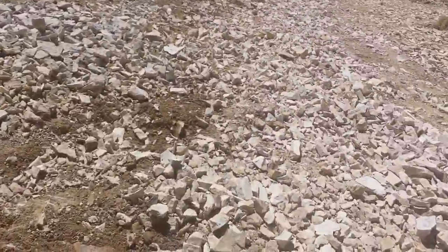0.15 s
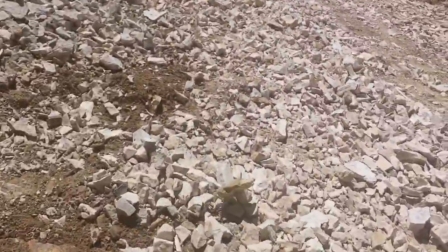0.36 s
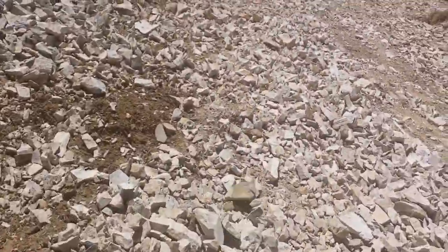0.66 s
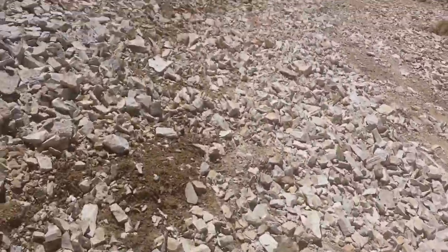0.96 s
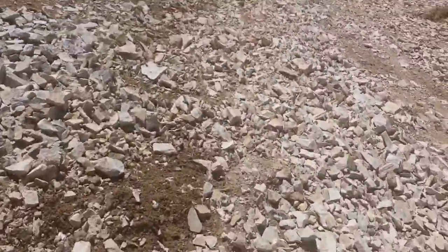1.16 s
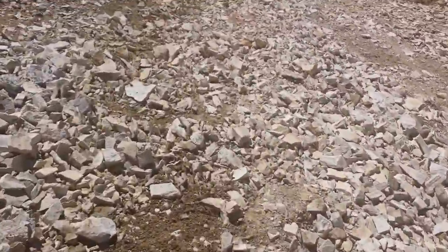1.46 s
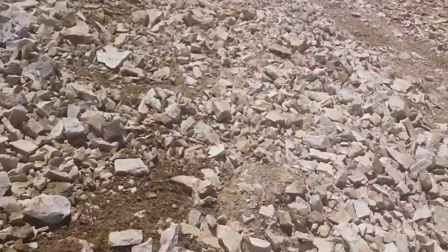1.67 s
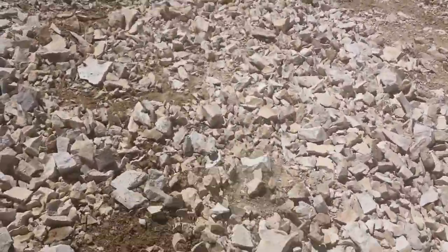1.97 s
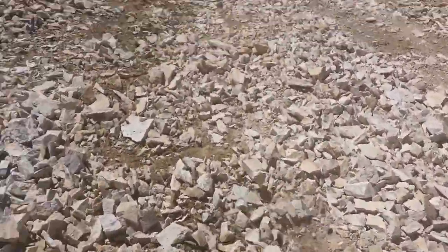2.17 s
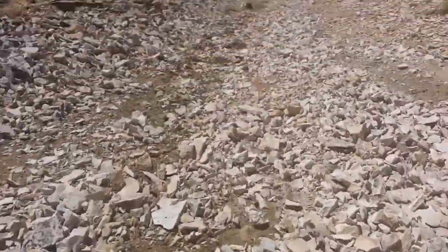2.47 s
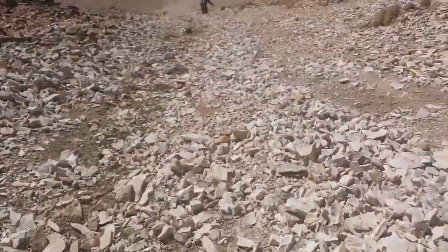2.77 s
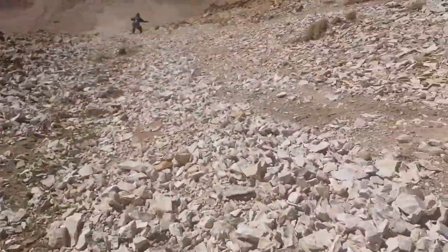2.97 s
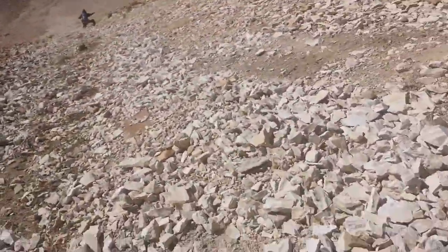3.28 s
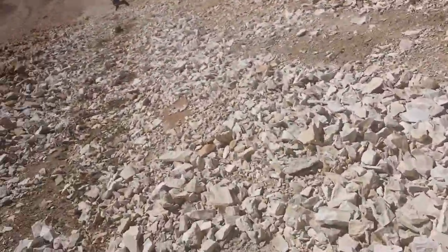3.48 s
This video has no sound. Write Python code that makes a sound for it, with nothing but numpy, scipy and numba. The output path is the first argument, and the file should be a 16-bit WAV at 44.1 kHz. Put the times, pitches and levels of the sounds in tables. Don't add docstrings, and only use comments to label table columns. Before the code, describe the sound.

Boots shift on loose scree outdoors: sharp stone clacks and a gravel slip, a quieter trickle, a strong second slide, then scattered ticking. Low wind thumps a close handheld microphone, mostly on the left.

```python
import sys
import numpy as np
from scipy import signal
from scipy.fft import rfft, irfft
from scipy.io import wavfile
from scipy.ndimage import uniform_filter1d
from numba import njit

SR = 44100
rng = np.random.default_rng(int(sys.argv[2]) if len(sys.argv) > 2 else 0)


def store_pcm(level_fs):
    pcm = np.round(np.clip(level_fs, -1, 1) * 32767).astype(np.int16)
    wavfile.write(sys.argv[1], SR, np.atleast_2d(pcm).T)


def boost_factor(decibels):
    exponent = np.asarray(decibels, float) / 20
    return 10 ** exponent


N = 159642

# pitch_hz, level_db
STONE_COLOUR = [(250, -54), (600, -19.5), (1300, -7.5), (3000, -2.5), (6000, 0), (15000, -4)]
# pitch_hz, level_db
LEFT_PORT = [(800, 4), (1500, 7), (3000, 4), (5400, 8.5), (7000, 3), (9000, -4.5), (10200, -12),
             (15000, -16)]
# pitch_hz, level_db
RIGHT_PORT = [(800, 1.5), (1500, -3), (3200, 1.5), (4000, 0), (7000, -0.5), (10000, -1.5), (13000, -4),
              (15000, -12)]

PORT_LAG_S = 0.00012
CHATTER_S = 0.003


def curve(table, order):
    rows = np.array(table, float)
    return np.interp(np.arange(N) / SR, rows[:, 0], rows[:, order])


def at_hz(points, hz):
    rows = np.array(points, float)
    return np.interp(np.log(hz), np.log(rows[:, 0]), rows[:, 1])


def unit(x):
    return x / np.sqrt(np.mean(x ** 2))


def colour(x, points, share=0.9):
    hz = np.maximum(np.arange(1025) * SR / 2048, 5)
    cepstrum = irfft(share * at_hz(points, hz) * np.log(10) / 20)
    cepstrum[1:1024] *= 2
    cepstrum[1025:] = 0
    impulse = irfft(np.exp(rfft(cepstrum)))
    return signal.fftconvolve(x, impulse)[:N]


def walk(rate_hz):
    hold = int(SR / rate_hz)
    levels = np.repeat(rng.standard_normal(N // 50)[:N // hold + 1], hold)
    smooth = uniform_filter1d(uniform_filter1d(levels, hold), hold)
    return unit(smooth[:N])


@njit
def ring(out, at, hz, cycles, size):
    for k in range(len(at)):
        i, w = int(at[k]), 2 * np.pi * hz[k] / SR
        turn = np.exp(1j * w - hz[k] / SR / cycles[k])
        z = size[k] * np.exp(1j * w * (i + 1 - at[k]))
        end = min(len(out), i + int(6 * cycles[k] * SR / hz[k]) + 2)
        for j in range(i + 1, end):
            if j >= 0:
                out[j] += z.imag
            z *= turn
    return out


def strike(at_s, hz, cycles, size, place, pan_db):
    ports = []
    for side in (1, -1):
        arrival = (at_s + side * place * PORT_LAG_S / 2) * SR
        ports.append(ring(np.zeros(N), arrival, hz, cycles, size * boost_factor(side * pan_db / 2)))
    return np.array(ports)


def grains(count, low_hz, high_hz, cycles, scatter_db, pan_db, modes=1, span=1.):
    c = rng.random((count, 3 + 2 * modes)).T
    g = rng.standard_normal((count, 3)).T
    size = boost_factor(-scatter_db * np.log(np.maximum(c[1], 7e-2)))
    ring_cycles = cycles * np.exp(.5 * g[2])
    pitches = low_hz + (high_hz - low_hz) * (span * c[3:3 + modes] + (1 - span) * c[2])
    delays = 2 * CHATTER_S * c[3 + modes:] ** 3
    out = 0
    for hz, late in zip(pitches, delays):
        mode_size = size * np.sqrt(hz / ring_cycles) * np.exp(-late / CHATTER_S)
        out = out + strike(c[0] * N / SR + late, hz, ring_cycles, mode_size, g[0], pan_db * g[1])
    return unit(out)


def surges(count, decay_s):
    c = rng.random((count, 2)).T
    kicks = np.bincount((c[0] * N).astype(int), -np.log(c[1] + 0.0065), N)
    flow = signal.lfilter([1], [1, -np.exp(-1 / (decay_s * SR))], kicks)
    return unit(np.sqrt(0.44 + flow))


def scree():
    # start_s, rush_level_db, loose_stones_against_rush_db
    slide = [(0, -19.5, -25), (.3, -24.5, -5.5), (.5, -24.5, -6), (.6, -31.5, 1), (.88, -32, -1),
             (1.03, -33, -3), (1.33, -35.5, 5), (1.39, -16.5, -12), (1.76, -20, -4), (1.97, -24.5, -1),
             (2.3, -27.5, -3), (2.45, -27.5, -0.5), (2.54, -32, 1), (2.62, -23, -18), (2.86, -26.5, 0),
             (3.1, -29, 2), (3.45, -30, 4.5), (3.62, -20, -7)]
    pebbles = grains(count=16000, low_hz=510, high_hz=8670, cycles=1.97, scatter_db=2.0, pan_db=3.0)
    pebbles = pebbles * surges(count=130, decay_s=0.0026)
    grit = grains(count=16000, low_hz=7900, high_hz=15800, cycles=0.76, scatter_db=3.5, pan_db=-2.0)
    grit = grit * surges(count=70, decay_s=0.015)
    loose = grains(count=1100, low_hz=393, high_hz=15000, cycles=9.4, scatter_db=2.5, pan_db=2,
                   modes=7, span=.4)
    loose = loose * boost_factor(curve(slide, order=2) - 2.0)
    return (0.58 * (pebbles + grit) + loose) * boost_factor(curve(slide, order=1))


def clacks():
    # start_s, peak_db, pitch_hz
    bigger = [(0.0199, -8, 3190), (0.0674, -9, 7080), (0.0952, -6, 5800), (0.1231, -8, 7290),
              (0.1506, 0, 6510), (0.175, -10, 5490), (0.2468, -8, 4370), (0.2703, -12, 5810),
              (0.3486, -10, 6760), (0.4804, -10, 5430), (0.5067, -11, 5430), (0.6225, -16, 5710),
              (0.6644, -15, 5150), (0.6888, -17, 2580), (0.7158, -12, 5920), (0.7572, -13, 5700),
              (0.8031, -14, 5720), (1.1368, -18, 6230), (1.288, -13, 5730), (1.3379, -15, 4880),
              (1.3964, -7, 5500), (1.4706, -6, 5400), (1.7409, -7, 4870), (1.8871, -8, 5410),
              (1.9155, -8, 5710),
              (2.0592, -6, 5350), (2.0734, -12, 5200), (2.144, -9, 5400), (2.162, -8, 5450),
             (2.2238, -11, 5750), (2.376, -11, 6080), (2.3885, -12, 5900), (2.4104, -12, 5660),
             (2.8789, -10, 5680), (2.9287, -10, 5600), (2.9597, -8, 5010), (3.1128, -12, 5830),
             (3.2126, -8, 5120), (3.2314, -11, 5510), (3.2595, -12, 5250), (3.3089, -10, 7910),
             (3.3199, -13, 5150), (3.3867, -10, 5850), (3.4116, -11, 5550), (3.4845, -10, 5140),
             (3.5129, -9, 5110)]
    at, db, hz = np.array(bigger).astype(float).T
    c = rng.random((len(at), 32)).T
    g = rng.standard_normal((len(at), 16)).T
    place, pan = .2 * g[0], g[1]
    at = at + .0006
    ports_db = at_hz(LEFT_PORT, hz) / 2 + at_hz(RIGHT_PORT, hz) / 2
    out = strike(at, hz, 7 + db / 4, boost_factor(db - at_hz(STONE_COLOUR, hz) - ports_db), place, pan)
    for k in range(2, 16):
        late = 3 * CHATTER_S * c[16 + k] ** 0.92 * (k % 2)
        mode_hz = 800 + 12000 * ((k - 1 - c[k]) / 14) ** 1.37
        size = boost_factor(db - 13.5 + 1.9 * g[k]) * np.exp(-late / CHATTER_S / 3)
        out = out + strike(at + late, mode_hz, 1.8 + 0 * at, size, place, pan)
    return out


def ticks():
    # start_s, peak_db, left_minus_right_db
    small = [(0.0564, -6, 5), (0.1314, -8, 6), (0.2604, -8, 4), (0.2774, -8, 8), (0.3963, -8, 4),
             (0.4634, -8, 9), (0.7765, -13, -1), (0.8161, -12, 7), (0.869, -13, 3), (0.9057, -11, 9),
             (0.9843, -14, 6), (1.1162, -11, 6), (1.1287, -14, 7), (1.1439, -15, 9), (1.1935, -15, 8),
             (1.204, -15, 5), (1.2424, -14, 8), (1.2531, -14, 9), (1.6106, -2, 4), (1.656, -1, 10),
             (1.7041, -4, 8), (1.7228, -4, -3), (1.754, -4, 7), (1.781, -1, 10), (1.7912, -4, 5),
             (1.7972, -4, 4), (1.8281, -5, 5), (1.8428, -2, 6), (1.8678, -2, 8), (1.9605, -7, 11),
             (1.9847, -4, 10), (2.0177, -7, 0), (2.089, -10, 2), (2.1716, -8, 5), (2.206, -10, 7),
             (2.424, -9, 2), (2.4424, -9, 11), (2.4507, -9, 7), (2.4629, -8, 16), (2.535, -14, 4),
             (2.5981, -7, 8), (2.6804, -9, 10), (2.868, -6, 8), (2.9695, -7, 7), (2.9822, -9, 7),
             (2.9952, -9, 1), (3.078, -10, 11), (3.1271, -9, 3), (3.205, -8, 11), (3.2209, -9, 7),
             (3.2434, -9, 10), (3.2723, -10, -3), (3.3703, -11, 9), (3.4182, -9, 4), (3.4342, -9, 7),
             (3.4484, -8, 7), (3.4783, -4, 3), (3.54, -8, 4), (3.5631, -6, 3), (3.6163, -2, 3)]
    at, db, pan = np.array(small, float).T
    c = rng.random((len(at), 9)).T
    at, place = at + 0.00081, c[8] - .5
    pan = pan - 5
    out = strike(at, 4600 + 2200 * c[0], 7.1 + 0 * at, boost_factor(db - 9), place, pan)
    for k in range(1, 8):
        late = 0.000209 * c[8 - k] * (k % 2) * k
        mode_hz = 1500 + 12000 * ((k - c[k]) / 7) ** 1.02
        out = out + strike(at + late, mode_hz, 1.73 + 0 * at, boost_factor(db - 10.5), place, pan)
    return out * boost_factor(-4.5)


def knocks():
    # start_s, peak_db, pitch_hz
    heavy = [
        (.0205, -14.5, 1630),
        (.1512, -22, 1130),
        (.182, -19, 1590),
        (2.0598, -15, 3000),
        (2.1625, -15.5, 1910),
        (2.389, -10, 2400),
        (2.97, -13, 3060),
    ]
    at, db, hz = np.array(heavy, float).T
    size = boost_factor(db - at_hz(STONE_COLOUR, hz) - 0.5)
    return strike(at, hz, 2.2 + 0 * at, size, 0 * at, 0 * at)


def sole():
    # start_s, level_db
    grind = [(0, -39), (.24, -48.5), (.31, -36), (.4, -46.5), (.6, -54), (1.32, -44.5), (1.37, -37),
             (1.55, -32.5), (1.69, -36), (1.77, -68), (2.38, -46.5), (2.42, -38), (2.58, -38), (2.84, -32),
             (2.92, -39.5), (3.2, -49), (3.47, -45), (3.55, -35.5)]
    # pitch_hz, level_db
    soil = [(70, -34.5), (150, -13), (300, -5.5), (700, -5), (1500, -7.5), (2600, -21), (5000, -30)]
    crunch = grains(count=5000, low_hz=100, high_hz=2614, cycles=1.77, scatter_db=-0.5, pan_db=3.0)
    crunch = crunch * boost_factor(2.1 * walk(40.06))
    dull = unit(np.array([colour(port, soil) for port in crunch]))
    return dull * boost_factor(curve(grind, order=1) + 2)


def notch(x):
    # pitch_hz, width_hz, depth_db
    bands = [
        (1940, 228, -6.5),
        (3720, 460, -6),
    ]
    hz = np.arange(N // 2 + 1) * SR / N
    gain_db = sum(db * np.exp(-((hz - f) / w) ** 2) for f, w, db in bands)
    return irfft(rfft(x) * boost_factor(gain_db), N)


@njit
def lowpass(x, hz, damping):
    y, band, low = np.empty(len(x)), 0., 0.
    for i in range(len(x)):
        g = np.tan(np.pi * hz[i] / SR)
        v = (band + g * (x[i] - low)) / (1 + g * (g + damping))
        y[i] = low + g * v
        band, low = 2 * v - band, 2 * y[i] - low
    return y


def buffet(db, hz):
    hz = np.clip(hz * (1 + 0.059 * walk(15.0)), 30, 600)
    puffs = rng.standard_normal(N) * boost_factor(2.6 * walk(55.))
    low = lowpass(lowpass(puffs, hz, 1.0), 1.85 * hz, 1.0) * np.sqrt(100 / hz)
    low_cut = signal.butter(3, 57.5, "high", fs=SR, output="sos")
    return unit(signal.sosfilt(low_cut, low)) * boost_factor(db)


def thumps():
    # start_s, peak_db, pitch_hz
    eddies = [(0.75, -21, 137), (0.826, -19.5, 174), (0.899, -13, 133), (1.004, -18, 184),
              (1.018, -13, 125), (1.036, -13.5, 139), (1.102, -7.5, 153), (1.158, -15, 150),
              (1.179, -9, 151), (1.235, -8, 129), (1.255, -1.5, 191), (1.293, -5, 174), (1.343, -4.5, 138),
              (1.489, -12.5, 122), (1.659, -10, 173), (1.939, -16.5, 133), (2.198, -19, 121),
              (3.189, -21.5, 110), (3.278, -15, 170), (3.334, -14.5, 138), (3.369, -15.5, 149),
              (3.46, -20, 131)]
    t = np.arange(N) / SR
    out = np.zeros(N)
    for start_s, db, hz in eddies:
        puff = np.exp(-((t - start_s) * hz / 0.47) ** 2)
        out += boost_factor(db) * puff * np.cos(2 * np.pi * hz * (t - start_s) + 1.33)
    return out


def left_wind():
    # start_s, level_db, eddy_pitch_hz
    gust = [(0, -35.5, 109), (.3, -53.5, 110), (.42, -34, 121), (.52, -40, 111), (.65, -61, 110),
            (.75, -41, 167), (1.05, -26, 187), (1.3, -17.5, 302), (1.4, -24.5, 175), (1.76, -39.5, 111),
            (1.82, -26.5, 112), (2.19, -31.5, 108), (2.25, -44.5, 100), (2.68, -57, 110), (3.0, -42, 110),
            (3.16, -33, 115), (3.36, -27, 141), (3.62, -44.5, 111)]
    return buffet(curve(gust, order=1) + 0.5, curve(gust, order=2)) + thumps()


def right_wind():
    # start_s, level_db
    lee = [(0, -40), (.3, -50), (.55, -43.5), (.92, -60), (1.18, -34), (1.45, -37.5), (1.78, -43),
           (1.86, -88), (2.2, -80), (2.3, -53), (2.66, -58), (3.3, -49), (3.42, -39), (3.52, -46),
           (3.6, -31)]
    return buffet(curve(lee, order=1), np.full(N, 100.))


def scene():
    stones = scree() * boost_factor(1) + clacks() * boost_factor(-0.5) + ticks() + knocks()
    ground = np.array([colour(port, STONE_COLOUR) for port in stones]) + sole()
    left = notch(colour(ground[0], LEFT_PORT)) + left_wind()
    right = colour(ground[1], RIGHT_PORT) + right_wind()
    return np.array([left, right])


@njit
def follow(x, release):
    level, y = 0., np.empty(len(x))
    for i in range(len(x)):
        level = max(x[i], level * release)
        y[i] = level
    return y


def top_cut(x):
    return signal.sosfilt(signal.butter(12, 15610, fs=SR, output="sos"), x)


def record(dry):
    limit, release_s = 1, .011
    peak = follow(np.abs(dry).max(axis=0), np.exp(-1 / (release_s * SR)))
    gain = np.minimum(1, limit / (peak + 1e-9)) ** 0.22
    mix = np.clip(dry * gain, -1, 1)
    return top_cut(mix)


dry = scene()
out = record(dry)
store_pcm(out)
```